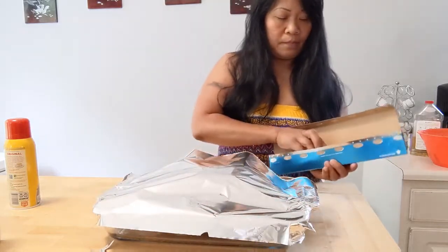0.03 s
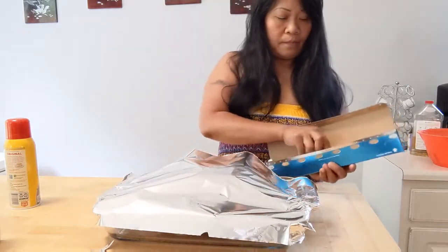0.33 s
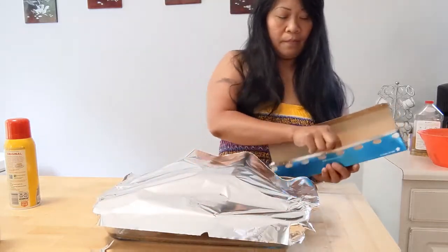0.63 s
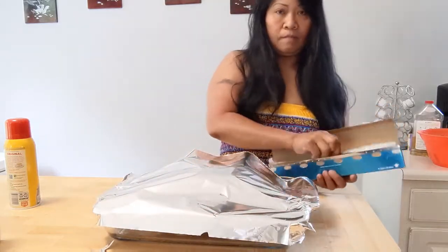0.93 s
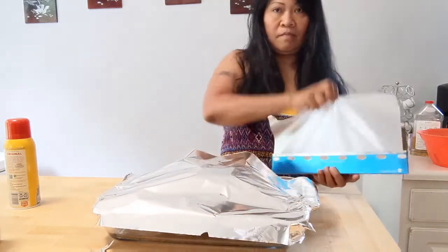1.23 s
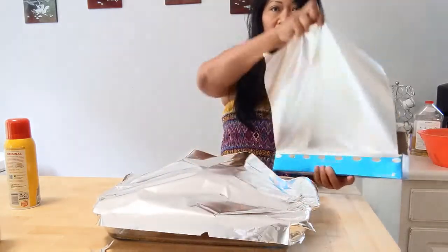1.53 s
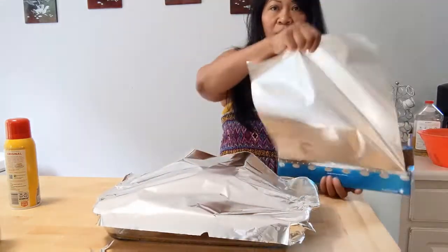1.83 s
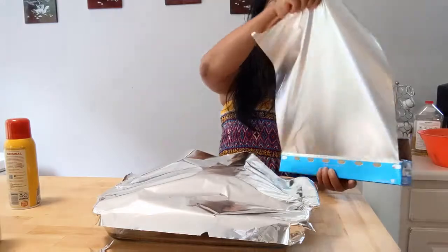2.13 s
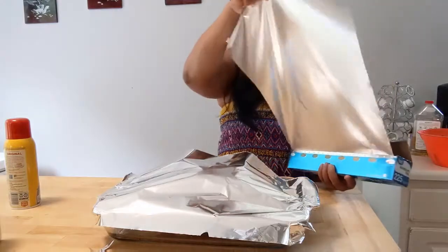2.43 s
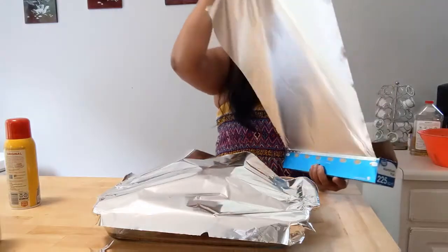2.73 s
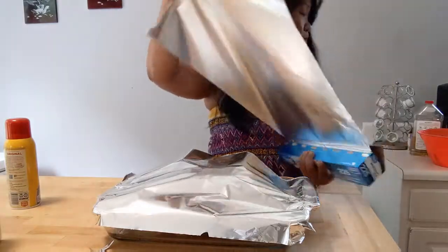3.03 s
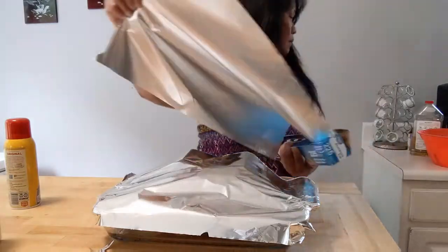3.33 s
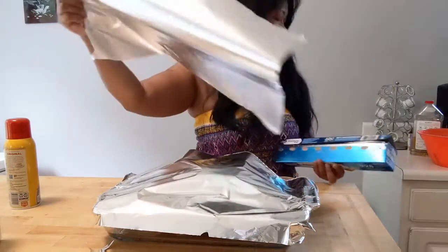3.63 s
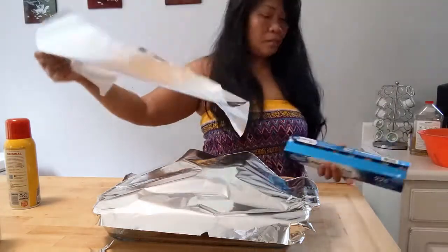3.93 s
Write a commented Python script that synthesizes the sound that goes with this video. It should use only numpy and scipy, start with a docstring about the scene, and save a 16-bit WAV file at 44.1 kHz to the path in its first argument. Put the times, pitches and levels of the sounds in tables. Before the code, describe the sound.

Aluminium foil crinkles faintly as fingers handle its cardboard box, then crackles louder as it is pulled off the knocking roll. The sheet rips off and rustles, close by in a slightly echoing kitchen.

```python
"""Fingers touch a cardboard box and lift the aluminium foil inside, which buckles in tiny snaps.
The foil is pulled off the roll, which knocks in the box and stops with a thump at about 2 s.
The sheet is drawn taut, rips along the serrated edge from 3.2 s, then rustles as it waves free.
Throughout, a bright, hard-walled kitchen adds its reflections and a low room tone."""
import sys
import numpy as np
from scipy import signal
from scipy.fft import rfft, irfft
from scipy.io import wavfile

SR = 44100
rng = np.random.default_rng(int(sys.argv[2]) if len(sys.argv) > 2 else 0)


def pcm_store(signal):
    """Save signal as 16-bit PCM."""
    levels = np.round(np.clip(np.atleast_2d(signal), -1, 1) * 32767)
    wavfile.write(sys.argv[1], SR, levels.astype(np.int16).T)


N = 176400
HZ = np.fft.rfftfreq(2048, 1 / SR)  # frequency grid of the filters
SLACK_SNAPS_PER_S = 3500

# earlier arrival on the left, for each place across the sheet (lead [s])
LEFT_LEADS_S = [.00012, .00017, .0002, .00024]
PLACES = len(LEFT_LEADS_S)


def amp(db):
    """Converts decibels to an amplitude ratio."""
    return 10 ** (np.asarray(db) / 20)


def unit_rms(x):
    """Normalises to unit mean power."""
    return x / np.sqrt(np.mean(x ** 2) + 1e-20)


def spectrum(points, hz=HZ):
    """Interpolates a table on a logarithmic frequency axis."""
    f, value = np.transpose(points)
    return np.interp(np.log(hz + 1), np.log(f + 1), value)


def envelope(curve):
    """Amplitude envelope from a curve's last column [dB], silent outside its span."""
    rows = np.array(curve)
    return amp(np.interp(np.arange(N) / SR, rows[:, 0], rows[:, -1], left=-200, right=-200))


def add(mix, start_s, sound):
    """Superposes a sound on the mix."""
    part = mix[max(round(start_s * SR), 0):][:len(sound)]
    part += sound[:len(part)]


def coloured(x, db):
    """Minimum-phase filter with the given gain on the HZ grid."""
    log_gain = np.log(amp(np.r_[db, db[-2:0:-1]]))
    taps = np.fft.ifft(np.exp(np.conj(signal.hilbert(log_gain)))).real
    return signal.oaconvolve(x, taps)[:len(x)]


def resonate(x, hz, width_hz, stages=1):
    """Forced response of damped resonators in series, whose frequency may glide."""
    phasor = np.exp(2j * np.pi * np.cumsum(hz * np.ones(len(x))) / SR)
    pole = np.exp(-np.pi * width_hz / SR)
    for _ in range(stages):
        x = 2 * (phasor * signal.lfilter([1 - pole], [1, -pole], x / phasor + 1e-18)).real
    return x


def room_tone():
    """Stationary low noise, highly correlated between left and right."""
    # background spectrum (frequency [Hz], relative density [dB])
    tone = [(20, -3), (35, -0.5), (70, -8.5), (140, -7.5), (220, -12), (370, -10), (600, -19.5),
            (1500, -23.5), (5000, -36), (15000, -42)]
    gain = amp(spectrum(tone, np.fft.rfftfreq(N, 1 / SR)))
    mid, side = irfft(rfft(rng.standard_normal((2, N))) * gain, N)
    return amp(-58.5) * unit_rms(np.array([mid + 0.27 * side, mid - 0.27 * side]))


def handling_rumble():
    """Amplitude-modulated low noise: a faint rumble while the box is handled."""
    # strength of the rumble (time [s], level [dB])
    handling = [(0, -64), (.25, -60.5), (.5, -57), (.65, -61), (.8, -64), (.95, -55), (1.1, -77)]
    # its spectrum (frequency [Hz], relative density [dB])
    tone = [(20, -5), (32, 5), (50, -11), (75, 4), (105, -20), (150, -10.5), (300, -17), (800, -50)]
    return envelope(handling) * unit_rms(coloured(rng.standard_normal(N), spectrum(tone)))


def snaps(per_s, spread_db):
    """A Poisson train of impulses, most small and a few large."""
    size = amp(spread_db * np.minimum(rng.exponential(1, N), 4.5)) * rng.choice([-1, 1], N)
    return size * (rng.random(N) < per_s / SR)


def crackle(curve, tone, per_s, spread_db, facets=16):
    """Impulse excitation: each snap rings one facet; flexing of the whole sheet gives the lows."""
    facet_spread_db, ring_s, crossover_hz = 4, .0011, 1100
    clicks = snaps(per_s, spread_db)
    struck_facet = rng.integers(0, facets, N)
    knots_hz = np.geomspace(300, 16000, 16)
    knots_db = facet_spread_db * rng.standard_normal((facets, len(knots_hz)))
    facet_db = np.array([np.interp(HZ, knots_hz, row) for row in knots_db])
    t = np.arange(2 * len(HZ) - 2) / SR
    rings = rng.standard_normal((facets, len(t))) * np.exp(-t / ring_s)
    ring_power = np.mean((amp(facet_db) * abs(rfft(rings))) ** 2, axis=0)
    # facets and flexing divide the power of one spectrum between them
    tone_db = spectrum(tone) - 10 * np.log10(np.mean(amp(spectrum(tone)) ** 2))
    flex_share = 1 / (1 + ((HZ + 50) / crossover_hz) ** 4)
    facet_db += tone_db + 10 * np.log10((1 - flex_share) / ring_power)
    flex_db = tone_db + 10 * np.log10(flex_share / PLACES)
    gain = envelope(curve)
    flexes = [gain * unit_rms(snaps(per_s, spread_db=2.5)) for _ in range(PLACES)]
    out = np.array([coloured(flex, flex_db) for flex in flexes])
    drive = gain * unit_rms(clicks)
    for k in range(facets):
        ring = coloured(rings[k], facet_db[k])
        out[k % PLACES] += signal.oaconvolve(drive * (struck_facet == k), ring)[:N]
    return out


def burst(level_db, decay_s, colour_db):
    """Exponential decay: a quick run of tiny slips merges into fading noise."""
    t = np.arange(SR // 4) / SR
    fade = np.exp(-t / decay_s)
    sound = coloured(rng.standard_normal(len(t)) * fade, colour_db)
    return amp(level_db) * sound * np.linalg.norm(fade) / np.linalg.norm(sound)


def buckling_foil():
    """Snap-through buckling: worked foil crackles, more evenly when under tension."""
    # how hard the foil is worked in each step (time [s], level [dB])
    fingering = [(0, -42.5), (.03, -48.5), (.08, -47), (.13, -56), (.2, -49.5), (.25, -53.5), (.3, -51.5),
                 (.37, -52), (.45, -56.5), (.6, -56.5), (.7, -60), (.79, -56.5), (.83, -62.5), (.88, -63)]
    lifting = [(.89, -47), (.98, -43.5), (1.015, -32.5), (1.04, -46), (1.085, -41.5), (1.13, -41),
               (1.19, -33.5), (1.22, -52), (1.27, -39.5), (1.295, -31.5), (1.35, -36), (1.41, -34.5),
               (1.46, -39.5), (1.53, -34.5)]
    pulling = [(1.52, -34), (1.55, -30), (1.68, -27.5), (1.77, -25.5), (1.85, -27.5), (1.9, -31.5),
               (1.925, -23), (1.98, -23), (2.015, -29.5), (2.07, -16), (2.11, -25), (2.14, -25.5),
               (2.2, -28.5), (2.26, -41)]
    tautening = [(2.22, -34.5), (2.33, -33), (2.38, -33), (2.45, -28), (2.52, -33.5), (2.6, -36),
                 (2.69, -32.5), (2.76, -29), (2.84, -31), (2.91, -31.5), (3, -33.5), (3.1, -34), (3.2, -37)]
    waving = [(3.53, -33.5), (3.6, -25.5), (3.635, -27.5), (3.67, -29), (3.695, -27), (3.76, -29.5),
              (3.82, -29), (3.88, -37), (3.94, -32), (4, -37.5)]
    # crackle spectrum in each step (frequency [Hz], relative density [dB])
    fingering_tone = [(150, -22), (500, -5.5), (880, -3), (1200, -2), (2000, -2.5), (3000, -1),
                      (5000, -3.5), (7000, -12), (10000, -6), (15500, -18.5)]
    lifting_tone = [(150, -16), (400, -7.5), (850, -2), (1500, -2), (2400, -3.5), (3300, -2.5), (4500, 1),
                    (7000, -4.5), (10500, -0.5), (15500, -11.5)]
    pulling_tone = [(100, -38), (400, -16), (800, -13), (1400, -8.5), (2100, -8.5), (3100, -4.5),
                    (3800, -3), (5400, -1.5), (7000, -5.5), (10000, -0.5), (13000, -3.5), (15500, -12)]
    tautening_tone = [(150, -25.5), (450, -14.5), (800, -11), (1300, -6.5), (1900, -6.5), (2800, -2),
                      (5000, -0.5), (7000, -4.5), (9500, -2), (12500, -4.5), (15500, -14)]
    waving_tone = [(200, -36), (500, -15.5), (800, -12), (1200, -4), (1900, -2.5), (2400, 0), (4500, 0),
                   (7000, -4), (10000, -1.5), (15500, -8.5)]
    slack = [(fingering, fingering_tone), (lifting, lifting_tone), (waving, waving_tone)]
    taut = [(pulling, pulling_tone), (tautening, tautening_tone)]
    out = sum(crackle(curve, tone, SLACK_SNAPS_PER_S, spread_db=5.5) for curve, tone in slack)
    return out + sum(crackle(curve, tone, per_s=2000, spread_db=3.5) for curve, tone in taut)


def fingered_box():
    """Resonance and friction: the open box rings and rasps under the fingers."""
    # fingers shaking and rubbing the cardboard (time [s], level [dB])
    touches = [(0, -54), (.05, -49), (.12, -74), (.21, -65), (.27, -69), (.6, -66), (.62, -55), (.66, -80)]
    rubs = [(.46, -60), (.5, -55), (.55, -73), (.76, -67), (.785, -59), (.83, -71), (.87, -52.5),
            (.9, -51.5), (.94, -64)]
    # friction spectrum (frequency [Hz], relative density [dB])
    rub_tone = [(150, -13), (400, -6), (900, 0.5), (1500, -2), (2500, -10), (6000, -30)]
    ring = resonate(snaps(SLACK_SNAPS_PER_S, spread_db=2), hz=895, width_hz=15)
    rasp = coloured(snaps(SLACK_SNAPS_PER_S, spread_db=2), spectrum(rub_tone))
    out = np.zeros((PLACES, N))
    out[3] = envelope(touches) * unit_rms(ring)
    out[0] = envelope(rubs) * unit_rms(rasp)
    return out


def creasing_foil():
    """Sudden release of strain: a crease gives way with one sharp crack and a run of slips."""
    # single creases (time [s], level [dB], decay [s], treble tilt [dB/octave])
    creases = [(.0403, -30.5, 0.0012, -2.5), (.2099, -30.5, 0.0057, -3), (.335, -41.5, 0.007, -1.5),
               (.527, -50, .002, -17), (.577, -43.5, 0.0024, -1), (.6165, -32, 0.0016, 1.5),
               (.8929, -38.5, 0.0054, -2), (.9293, -38, 0.0037, -4.5), (1.014, -29, 0.0043, 4.5),
               (1.0894, -24.5, 0.0027, 8), (1.1812, -26, 0.0051, 12), (1.275, -25, .003, 10),
               (1.29, -30, .003, 1), (1.345, -20, 0.0017, -1), (1.359, -24, .001, 2), (1.383, -20, .001, 4),
               (1.417, -29, 0.0011, 0), (1.5414, -29, .003, 2), (1.846, -15.5, 0.0083, 2),
               (1.9119, -9.5, 0.004, 4.5), (1.945, -16.5, .006, 5), (1.98, -22, .004, 5),
               (2.0386, -14, 0.0033, 2), (2.064, -8, 0.0059, 8), (2.108, -9, .003, 12),
               (3.2045, -33, 0.0036, -5), (3.3367, -19, 0.0033, -14), (3.446, -15, 0.0016, -3),
               (3.484, -9, .004, 4), (3.495, -16, 0.0013, -4)]
    # their spectrum before the tilt (frequency [Hz], relative density [dB])
    tone = [(200, -29), (900, -7.5), (2000, -9.5), (3200, 2), (5400, 1), (7000, -5.5), (10000, 1.5),
            (15500, -7)]
    treble_octaves = np.log2(np.maximum(HZ / 2400, 1))
    out = np.zeros((PLACES, N))
    for k, (start_s, db, decay_s, tilt_db) in enumerate(creases):
        colour = spectrum(tone) + tilt_db * treble_octaves
        crack = burst(db + 3, decay_s=0.00086, colour_db=colour)
        add(out[k % PLACES], start_s, crack + burst(db, decay_s, colour))
    return out


def knocking_roll():
    """Damped impacts: roll and sheet knock on the hollow box; the roll stops with a dull thump."""
    # impacts (time [s], level [dB], decay [s], centre frequency [Hz])
    knocks = [(.617, -47, 0.0055, 920), (.925, -45, 0.0058, 343), (1.159, -31.5, 0.011, 790),
              (1.335, -46, 0.016, 650), (1.542, -41.5, 0.026, 544), (1.73, -45, 0.026, 480),
              (1.912, -43.5, .035, 340), (2.064, -32, 0.013, 590), (3.382, -33, 0.0041, 377),
              (3.68, -48, .008, 420), (3.765, -37.5, 0.022, 490)]
    # knock spectrum (distance from the centre [octaves], relative density [dB])
    knock_shape = [(-2.5, -22), (-1.2, -13), (-.45, 0), (.45, 0), (1.1, -8), (2, -20), (4, -50)]
    # thump spectrum (frequency [Hz], relative density [dB])
    thump_tone = [(25, 6), (70, 3), (120, 0), (200, -2), (400, -12), (2000, -52)]
    out = np.zeros((PLACES, N))
    for k, (start_s, db, decay_s, hz) in enumerate(knocks):
        colour = np.interp(np.log2((HZ + 1) / hz), *np.transpose(knock_shape))
        add(out[k % PLACES], start_s, burst(db, decay_s, colour))
    thump = burst(level_db=-39, decay_s=0.023, colour_db=spectrum(thump_tone))
    add(out[2], start_s=2.06, sound=thump)
    return out


def tearing_foil():
    """Fracture: the teeth rip the foil in snaps that force sheet and box into resonance."""
    # strength of the rip and of the box's vibration (time [s], level [dB])
    tearing = [(3.2, -31), (3.235, -24.5), (3.265, -20), (3.3, -26.5), (3.34, -15.5), (3.36, -23),
               (3.385, -16.5), (3.41, -18), (3.45, -13.5), (3.49, -18), (3.505, -24), (3.54, -25)]
    box_shake = [(3.22, -44), (3.34, -36.5), (3.4, -37), (3.45, -26), (3.495, -24.5), (3.52, -36)]
    # rip spectrum (frequency [Hz], relative density [dB])
    tone = [(100, -26), (250, -15), (450, -7), (630, -5.5), (850, -6), (1900, 1.5), (2600, 2), (3500, 1.5),
            (5000, 3), (7000, -1.5), (8600, 1.5), (10500, 4), (13000, 1), (15500, -4.5)]
    # the sheet's resonance glides as the rip runs (time [s], frequency [Hz], level [dB])
    glide = [(3.24, 870, -47), (3.27, 890, -33), (3.321, 2450, -49), (3.34, 2163, -19.5),
             (3.361, 1294, -39), (3.41, 840, -37.5), (3.451, 813, -25.5), (3.483, 1190, -28),
             (3.503, 1510, -30)]
    # cardboard modes (frequency [Hz], bandwidth per stage [Hz], relative level [dB])
    modes = [(847, 37, 2), (910, 13, -5), (1155, 71, 3), (1417, 29, 3), (1472, 28, 5), (1642, 48, 7),
             (2280, 57, 4.5), (2890, 370, 7)]
    out = crackle(tearing, tone, per_s=2400, spread_db=2.5)
    teeth = snaps(per_s=2400, spread_db=2.5)
    glide_s, glide_hz, _ = np.transpose(glide)
    ring_hz = np.interp(np.arange(N) / SR, glide_s, glide_hz)
    sheet_ring = resonate(teeth, ring_hz, width_hz=186, stages=2)
    box_ring = sum(amp(db) * unit_rms(resonate(teeth, hz, width, stages=2)) for hz, width, db in modes)
    out[1] += envelope(glide) * unit_rms(sheet_ring)
    out[2] += envelope(box_shake) * unit_rms(box_ring)
    return out


def kitchen(source, lead_s, size=24000):
    """Reverberation: direct sound, on the left first, then dense reflections that decay by band."""
    # reverberation time (frequency [Hz], time to fall 60 dB [s])
    reverb_times = [(150, 0.19), (800, 0.39), (2500, 0.41), (5500, 0.3), (10000, 0.27), (15500, 0.18)]
    # direct-to-reverberant ratio (frequency [Hz], ratio [dB])
    direct_ratio = [(100, 25), (400, 5.5), (1000, 0.5), (3000, -1.5), (15000, -10.5)]
    # level difference between the sides (frequency [Hz], left minus right [dB])
    balance = [(100, 1.5), (500, -0.5), (1200, 0.5), (5000, 0.5), (9000, 3), (13500, -3.5)]
    t = np.arange(size) / SR
    echoes_per_s = 1500 + 60000 * t
    echoes = rng.standard_normal((2, size)) * (rng.random((2, size)) < echoes_per_s / SR)
    echoes = echoes / np.sqrt(echoes_per_s) * (t > .002)
    hz, frame_s, bands = signal.stft(echoes, SR, nperseg=256)
    t60 = spectrum(reverb_times, hz)[:, None]
    bands = bands * amp(-60 * frame_s / t60) / np.sqrt(t60)  # similar energy in every band
    tails = signal.istft(bands, SR, nperseg=256)[1][:, :size]
    direct_db = spectrum(direct_ratio)
    wet_db = -10 * np.log10(1 + amp(direct_db) ** 2)
    out = []
    for side, tail in zip((1, -1), tails):
        direct = np.sinc((t - .0003 + side * lead_s / 2) * SR)
        path = coloured(direct, wet_db + direct_db) + coloured(tail / np.linalg.norm(tail), wet_db)
        path = coloured(path, side * spectrum(balance) / 2)
        out.append(signal.oaconvolve(source, path)[:N])
    return np.array(out)


def scene():
    """Superposition: foil and box sound through the kitchen, over room tone and rumble."""
    background = room_tone() + handling_rumble()
    sources = buckling_foil() + fingered_box() + creasing_foil() + knocking_roll() + tearing_foil()
    return background + sum(kitchen(source, lead_s) for source, lead_s in zip(sources, LEFT_LEADS_S))


def record(dry):
    """Band limiting: a linear-phase low-pass removes the highest treble."""
    cutoff_hz = 15600
    lowpass = signal.firwin(511, cutoff_hz, window=("kaiser", 9), fs=SR)
    return signal.oaconvolve(dry, lowpass[None], "same")


dry = scene()
out = record(dry)
pcm_store(out)
```